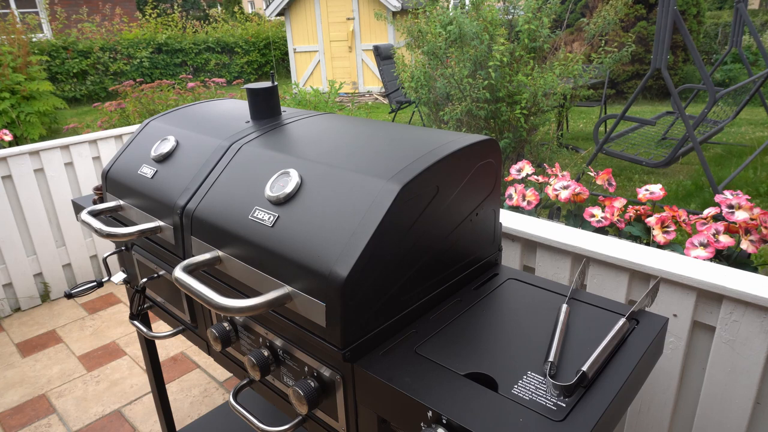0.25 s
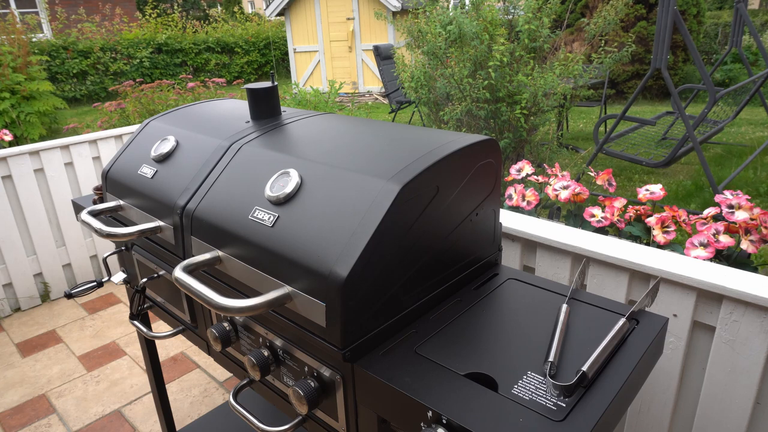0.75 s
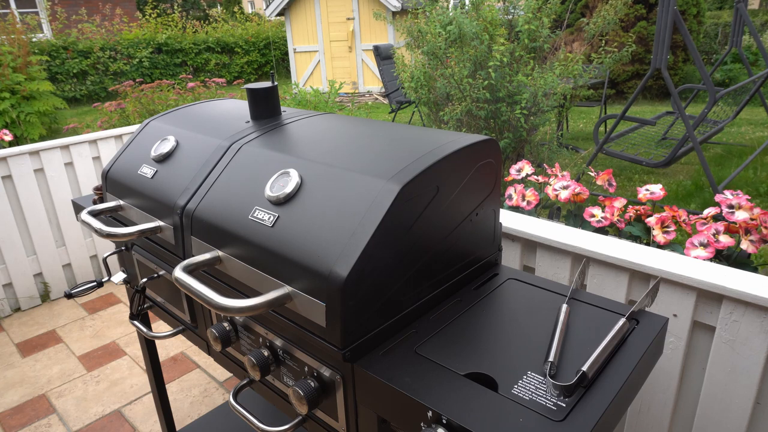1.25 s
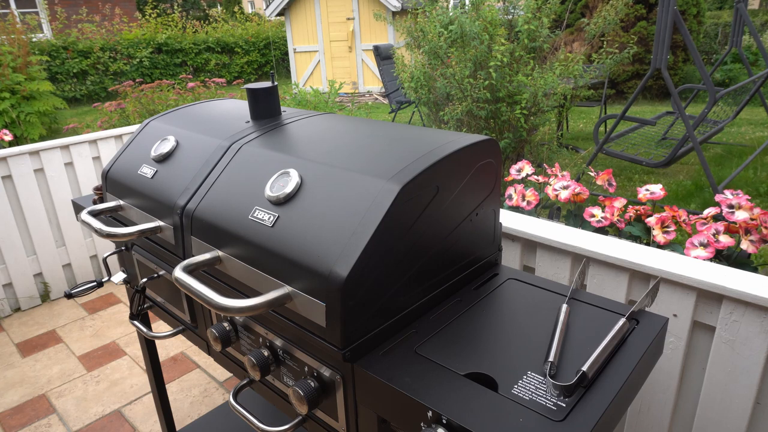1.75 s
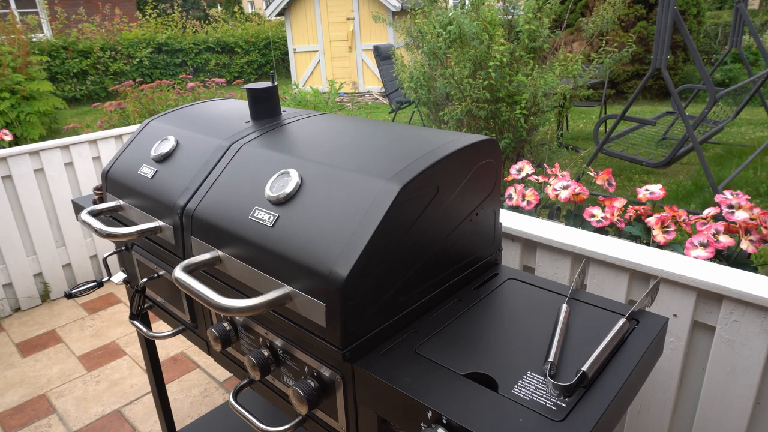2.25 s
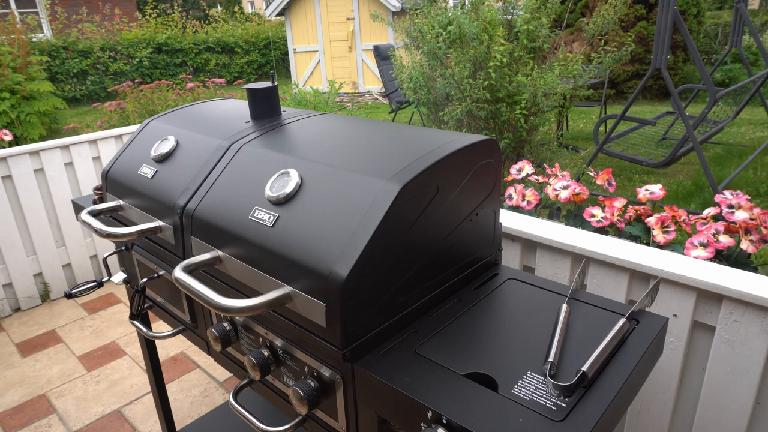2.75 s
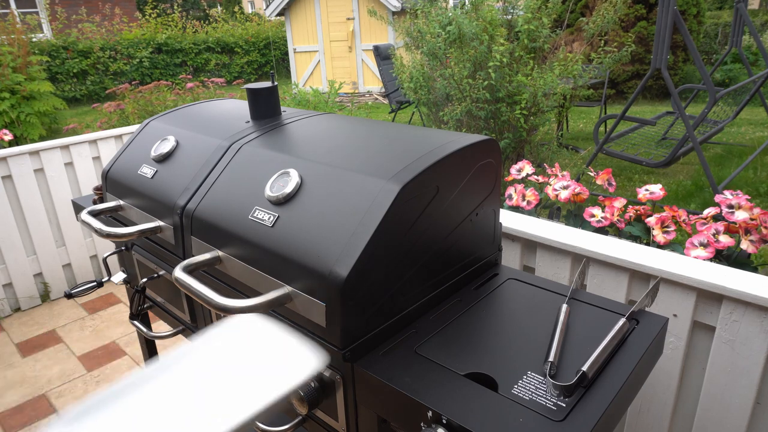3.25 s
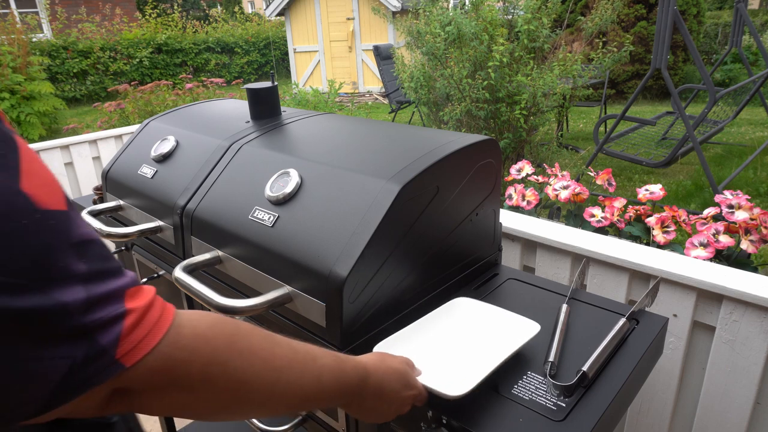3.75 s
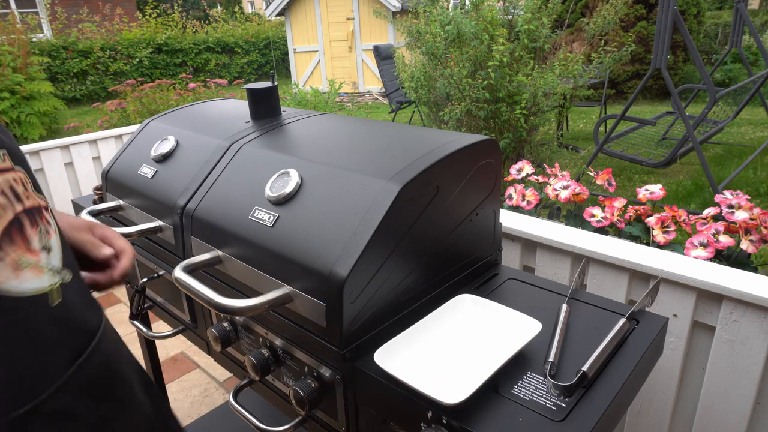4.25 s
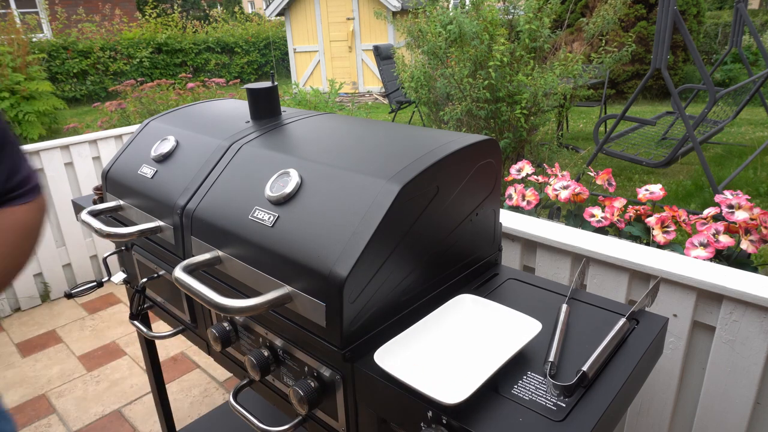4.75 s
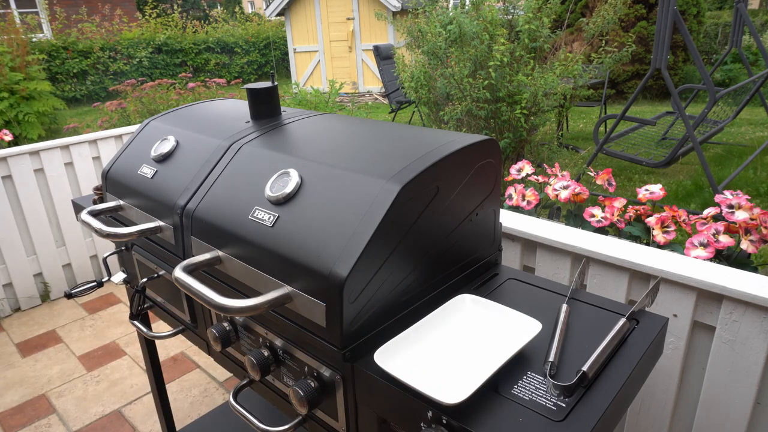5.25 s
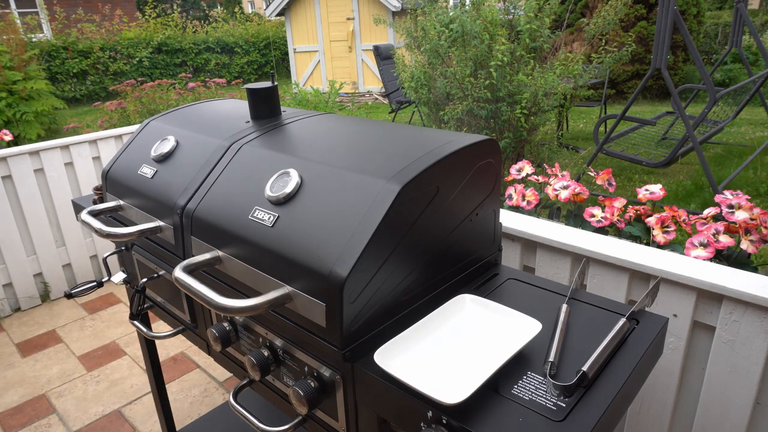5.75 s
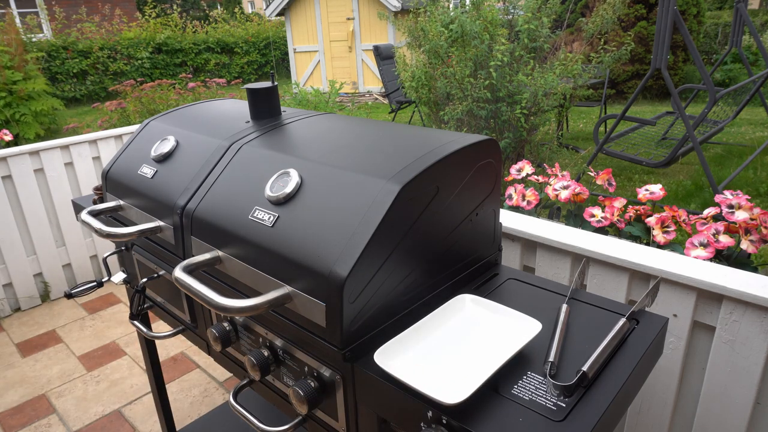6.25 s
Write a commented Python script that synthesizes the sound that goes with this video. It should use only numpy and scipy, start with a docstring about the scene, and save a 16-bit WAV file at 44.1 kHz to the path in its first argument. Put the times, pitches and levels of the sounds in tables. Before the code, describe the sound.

On an open patio, a covered gas grill gives a quiet, even frying hiss with occasional pops, low flames and a faint faraway motor drone. After some soft steps and a metallic tick, a plate is set down on a sheet-steel shelf close to the microphone, making a loud, brief, chattering clatter with a thin ring afterwards. A low thump and a couple of ticks follow while the sizzling continues.

```python
"""Food sizzles under the closed lid of a gas grill on a patio: bursting bubbles of fat hiss, spit and pop,
coloured by the hood's air resonances, while hot metal ticks and the burners murmur. Someone steps up
and sets a plate on the sheet-steel side shelf; it chatters down in two goes, exciting the shelf's modes,
overloading the microphone and leaving the tongs ringing. Air puffs by and a motor drones far off."""
import sys
import numpy as np
from scipy import signal
from scipy.fft import rfft, irfft, next_fast_len
from scipy.io import wavfile
from scipy.ndimage import map_coordinates

SR = 44100
rng = np.random.default_rng(int(sys.argv[2]) if len(sys.argv) > 2 else 0)


def wav_record(signal):
    """Record a signal, one row per channel, as 16-bit PCM in the file named by sys.argv[1]."""
    frames = np.transpose(np.atleast_2d(signal))
    bounded = np.clip(frames, -1, 1)
    # unit amplitude maps onto the largest positive 16-bit level
    quanta = np.round(bounded * 32767).astype(np.int16)
    wavfile.write(sys.argv[1], SR, quanta)


N = 286209

# broad spectrum of the sizzle: (frequency [Hz], relative level [dB])
SIZZLE_SPECTRUM = [(160, -22), (280, -0.5), (379, -3.5), (472, 0), (588, -4.5), (853, -3), (1460, -8),
                   (1620, -7.5), (2020, -8), (3350, -5.5), (4170, -8), (5370, -11), (8180, -11),
                   (13800, -15), (15800, -14.5)]
# air resonances of the hood: (frequency [Hz], bandwidth [Hz], gain [dB])
HOOD_MODES = [(489, 84, -11.5), (1607, 74, -5.5), (3200, 420, -16), (3330, 80, -20), (5600, 70, -17),
              (7170, 100, -7.5), (8580, 89, -4)]
# fat spitting on hot metal, and in the longer rows slow swells of the whole frying: (peak time [s], level [dB],
# length [s], width [octaves])
SPITS_AND_SWELLS = [(0.495, -40.5, 0.1, 2), (0.623, -39.5, 0.046, 0.61), (1.799, -43.5, 0.13, 1.5),
                    (2.297, -40, 0.063, 2.9), (2.681, -45.5, 0.36, 1.2), (2.779, -42, 0.022, 0.45),
                    (3.202, -40, 0.034, 1.2), (3.6, -43.5, 0.56, 1.8), (4.353, -46.5, 0.16, 1),
                    (4.79, -42.5, 0.11, 1.5), (5.022, -42, 0.035, 1.4), (5.4, -45.5, 0.74, 1.7),
                    (5.386, -38.5, 0.02, 0.5), (5.563, -39, 0.06, 0.38)]
# pops inside the hood: (time [s], level [dB], centre [Hz], width [octaves])
FAT_POPS = [(.421, -35.5, 1600, 1.7), (0.882, -34, 1490, 1.1), (1.636, -38, 5000, 1.4),
            (1.901, -26.5, 4700, 1.4), (2.2168, -36.5, 4000, 1.2), (2.585, -36, 900, 2.5),
            (3.3187, -35, 3700, 1.2)]
# plate edges hitting the shelf: (time [s], gain [dB], hardness [dB/octave], first flight [s])
PLATE_STRIKES = [(3.687, -1, 1, 0.016), (3.721, -0.5, 5.5, 0.024), (3.896, -1.5, -1.3, 0.015)]
# dense ring of the steel shelf: (frequency [Hz], relative level [dB])
SHELF_SPECTRUM = [(40, -55), (100, -8), (230, -8), (300, -8.5), (420, 1.5), (650, -1.5), (1100, 3),
                  (2100, -1), (3400, 1), (4200, -6.5), (5800, -11), (8000, -21.5), (12000, -25),
                  (15500, -36)]
# decay of that ring: (frequency [Hz], T60 [s])
SHELF_DECAY = [(100, 0.85), (400, 0.46), (1000, 0.29), (3000, 0.22), (6000, 0.19), (13000, 0.12)]
# strong modes of plate and shelf: (frequency [Hz], relative level [dB], T60 [s])
SHELF_MODES = [(380, -24, .5), (425, -26, .8), (497, -23, .6), (534, -16, .38), (673, -29, .8),
               (763, -18, .35), (797, -28, .75), (861, -11, .24), (1109, -22, .45), (1137, -16, .25),
               (1204, -18, .25), (1292, -18, .25), (1436, -18, .25), (1487, -17, .3), (1578, -17, .33),
               (1725, -18, .25), (1881, -18, .27), (2116, -22, .33), (2364, -19, .25), (2477, -12.5, .35),
               (2591, -17, .24), (2896, -18, .22), (3036, -33, .7), (3170, -17, .22), (3247, -17, .22),
               (3332, -16, .27), (3690, -19, .2)]
# slow after-ring of the grill cart: (frequency [Hz], T60 [s])
CART_DECAY = [(100, 3), (400, 1.44), (1000, 0.79), (3000, 0.58), (10000, 0.13)]
# ticks of hot metal: (time [s], level [dB], frequency [Hz])
METAL_TICKS = [(3.402, -18, 3200), (5.3613, -17.5, 4000), (5.8526, -14.5, 2300)]
# murmur of the flames: (frequency [Hz], relative level [dB])
BURNER_SPECTRUM = [(15, -41), (30, -32), (70, -2), (110, 1.5), (155, 1), (205, -3), (235, 2), (275, -15.5),
                   (400, -15), (900, -50)]
# soft steps and bumps: (time [s], level [dB], frequency [Hz], T60 [s])
STEP_THUDS = [(1.865, -32, 169, 0.12), (2.288, -27.5, 156, 0.11), (3.196, -26, 185, 0.083),
              (3.402, -31, 171, .07), (5.146, -15.5, 160, 0.029), (5.857, -34.5, 260, 0.16)]
# puffs of air at the microphone: (peak time [s], level [dB])
AIR_PUFFS = [(3.03, -47), (6.33, -40.5)]
# partials of the distant motor: (frequency [Hz], level [dB])
MOTOR_PARTIALS = [(49.7, -51), (99.8, -51.5)]


def sizzle(body_db=-44, spray_db=-45, lid_cutoff_hz=5500):
    """Transmission loss: the lid low-passes the hiss of frying, while fine spray escapes by its gaps."""
    wander_db = 0.14 * wobble(2.8)
    through_lid = lambda hz: 1 / np.sqrt(1 + (hz / lid_cutoff_hz) ** 6)
    through_gaps = lambda hz: np.sqrt(1 - through_lid(hz) ** 2)
    body = unit(filtered(bubbles(), lambda hz: hood_colour(hz) * through_lid(hz)))
    body *= amp(body_db + wander_db)
    spray = unit(filtered(bubbles(), lambda hz: hood_colour(hz) * through_gaps(hz)))
    spray *= amp(spray_db + 0.5 * wander_db + 0.5 * wobble(30))
    return under_lid(body + spray) * amp(0.45 * wobble(25))


def bubbles():
    """Superposition: countless tiny bubbles blur to Gaussian noise; larger ones crackle through it."""
    blur = rng.standard_normal(N)
    soft = amp(-2) * crackle(per_second=160, spread_db=2.0, life_s=0.0034)
    sharp = amp(-7.5) * crackle(per_second=300, spread_db=3.5, life_s=0.0015)
    return unit(blur + soft + sharp)


def crackle(per_second, spread_db, life_s):
    """Shot noise: bubbles of random size burst at random times, each a puff of decaying power."""
    when, size_draw = rng.random((int(per_second * N / SR), 2)).T
    sizes = amp(spread_db * np.minimum(-np.log(1 - size_draw), 4))
    bursts = np.bincount((when * N).astype(int), sizes ** 2, N)
    power = signal.lfilter([1], [1, -np.exp(-1 / (life_s * SR))], bursts)
    return unit(np.sqrt(power) * rng.standard_normal(N))


def hood_colour(hz):
    """Cavity resonance: the air under the hood lifts a few bands of the sizzle's spectrum."""
    resonances = sum(amp(db) * 1j * hz * width / (centre ** 2 - hz ** 2 + 1j * hz * width)
                     for centre, width, db in HOOD_MODES)
    return amp(along(SIZZLE_SPECTRUM, hz)) * (1 + resonances)


def under_lid(x, echo_db=-15, t60=0.06):
    """Comb filtering: weak reflections between lid and grate put a fine ripple on the spectrum."""
    t = np.arange(SR // 20) / SR
    echoes = rng.standard_normal(len(t)) * amp(-60 * t / t60) * (t > 0.002)
    echoes = filtered(echoes / np.linalg.norm(echoes), lambda hz: hz / (hz + 500))
    return x + amp(echo_db) * signal.fftconvolve(x, echoes)[:N]


def hiss(centre_hz, octaves, size):
    """Band-pass filtering: one band of the sizzle, as the hood colours it."""
    return noise(lambda hz: band(hz, centre_hz, octaves) * hood_colour(hz), size)


def spits(centre_hz=3240):
    """Flash boiling: drops of fat on hot metal hiss, swelling and fading with a flutter; the longer entries are
    slow swells of the whole frying."""
    out, t = np.zeros(N), np.arange(SR) / SR - 0.5
    for s, db, length, octaves in SPITS_AND_SWELLS:
        swell = np.exp(-2 * (t / length) ** 2)
        add(out, s - 0.5, amp(db) * swell * hiss(centre_hz, octaves, len(t)))
    return out * amp(1.2 * wobble(120))


def pops(rattle_t60=0.16, echo_db=-13.5, echo_t60=0.38):
    """Reverberation: each sudden burst rattles round the hood, which answers with a longer echo."""
    out, t = np.zeros(N), np.arange(SR // 3) / SR
    for s, db, centre_hz, octaves in FAT_POPS:
        rattle = amp(-60 * t / rattle_t60) * hiss(centre_hz, octaves, len(t))
        echo = amp(echo_db - 60 * t / echo_t60) * hiss(centre_hz=3000, octaves=0.7, size=len(t))
        add(out, s, amp(db) * (rattle + echo))
    return out


def plate(bounces=5, restitution=0.78, rebound_loss_db=3.5, bounce_loss_db=1):
    """Inelastic collision: after each strike the plate bounces ever sooner and more weakly."""
    out = np.zeros(N)
    for s, db, hardness, first_flight in PLATE_STRIKES:
        add(out, s, amp(db) * contact(hardness, crack_db=-3))
        flights = first_flight * restitution ** np.arange(bounces)
        for k, delay in enumerate(np.cumsum(flights)):
            gain = amp(db - rebound_loss_db - bounce_loss_db * k)
            add(out, s + delay, gain * contact(hardness=1.7, crack_db=-10))
    return out


def contact(hardness, crack_db, crack_t60=0.015):
    """Impulse excitation: a contact cracks and rings plate, shelf and cart; harder is brighter."""
    t = np.arange(SR) / SR
    colour = lambda hz: amp(along(SHELF_SPECTRUM, hz) + hardness * np.log2(1 + hz / 1500))
    shimmer = amp(-4) * damped(noise(colour, len(t)), SHELF_DECAY)
    cart = amp(-19.5) * damped(noise(colour, len(t)), CART_DECAY)
    crack = amp(crack_db - 60 * t / crack_t60) * noise(colour, len(t))
    ring = np.zeros(len(t))
    for hz, db, t60 in SHELF_MODES:
        envelope = amp(db + 2 * rng.standard_normal() - 60 * t / t60)
        ring += envelope * np.sin(2 * np.pi * (hz * t + rng.random()))
    return shimmer + cart + crack + amp(-3.5) * ring


def tongs(hz=984, db=-36.5, free_t60=4, settle_s=4.72, settled_t60=0.68):
    """Free vibration: the first strike sets the steel tongs ringing until settling adds damping."""
    out, t = np.zeros(N), np.arange(2 * SR) / SR
    struck_s = PLATE_STRIKES[0][0]
    since_settling = np.maximum(struck_s + t - settle_s, 0)
    fall_db = 60 * t / free_t60 + 60 * since_settling / settled_t60
    add(out, struck_s, amp(db - fall_db) * np.sin(2 * np.pi * hz * t))
    return out


def ticks(decay_cycles=0.47, echo_db=-20.5, echo_t60=0.26):
    """Stick-slip: hot metal gives way with one sharp swing, and the hood answers faintly."""
    out, t = np.zeros(N), np.arange(SR // 3) / SR
    for s, db, hz in METAL_TICKS:
        snap = np.sin(2 * np.pi * hz * t) * np.exp(-hz * t / decay_cycles)
        echo = amp(echo_db - 60 * t / echo_t60) * hiss(hz, octaves=1.8, size=len(t))
        add(out, s, amp(db) * (snap + echo))
    return out


def burners(flame_db=-44, whistle_db=-62, whistle_hz=10376):
    """Combustion and jet noise: the flames murmur low and the gas jet whistles in a narrow band."""
    flames = noise(lambda hz: amp(along(BURNER_SPECTRUM, hz)), N) * amp(flame_db + 1.5 * wobble(5.6))
    whistle = noise(lambda hz: 1 / (1 + ((hz - whistle_hz) / 30) ** 2), N)
    return flames + whistle * amp(whistle_db + 0.7 * wobble(15))


def footsteps(rise_s=0.0034):
    """Damped oscillation: each soft step or bump is a brief low tone with a little rumble round it."""
    out, t = np.zeros(N), np.arange(SR // 3) / SR
    for s, db, centre_hz, t60 in STEP_THUDS:
        tone = np.sin(2 * np.pi * centre_hz * t)
        rumble = noise(lambda hz: band(hz, centre_hz, octaves=0.51), len(t))
        envelope = amp(db - 60 * t / t60) * (1 - np.exp(-t / rise_s))
        add(out, s, envelope * (tone + 0.5 * rumble))
    return out


def draught(rise_s=0.04, fall_s=0.22, still_air_db=-68):
    """Turbulence: each puff of air at the microphone is a low rumble that rises quickly and ebbs."""
    t = np.arange(N) / SR
    flow = sum(amp(db) * np.exp(-np.maximum((s - t) / rise_s, (t - s) / fall_s)) for s, db in AIR_PUFFS)
    return (amp(still_air_db) + flow) * noise(lambda hz: band(hz, centre_hz=30, octaves=0.79), N)


def motor(speed_spread=0.01204):
    """Periodic vibration: a far motor drones on two partials that waver together with its speed."""
    warped_time = np.cumsum(1 + speed_spread * wobble(4)) / SR
    return sum(np.sqrt(2) * amp(db + 0.87 * wobble(6.6)) * np.sin(2 * np.pi * hz * warped_time)
               for hz, db in MOTOR_PARTIALS)


def amp(db):
    """Decibels to amplitude ratio."""
    return 10 ** (np.asarray(db) / 20)


def unit(x):
    """Normalisation to rms 1."""
    return x / np.sqrt(np.mean(x ** 2) + 1e-20)


def along(points, hz):
    """Interpolation of (frequency [Hz], value) points on a log-frequency axis."""
    frequencies, values = np.transpose(points)
    return np.interp(np.log(hz + 1), np.log(frequencies + 1), values)


def band(hz, centre_hz, octaves):
    """Gaussian passband on a log-frequency axis."""
    return np.exp(-0.5 * (np.log2((hz + 1) / centre_hz) / octaves) ** 2)


def wobble(rate):
    """Random modulation: a smooth curve with `rate` knots a second."""
    knots = rng.standard_normal(int(N * rate / SR) + 4)
    return map_coordinates(knots, [np.arange(N) * rate / SR])


def filtered(x, response):
    """Linear filtering: the spectrum of x times a frequency response."""
    size = next_fast_len(len(x) + SR // 10)
    return irfft(rfft(x, size) * response(np.fft.rfftfreq(size, 1 / SR)), size)[:len(x)]


def noise(response, size):
    """Spectral shaping: coloured noise of rms 1."""
    return unit(filtered(rng.standard_normal(size), response))


def damped(x, t60s):
    """Frequency-dependent damping: each band of x decays at its own rate."""
    hz, t, spectra = signal.stft(x, SR, nperseg=256)
    decay = amp(-60 * t / along(t60s, hz)[:, None])
    return signal.istft(spectra * decay, SR, nperseg=256)[1][:len(x)]


def add(track, s, sound):
    """Superposition of a sound on the track at s seconds."""
    start = max(round(s * SR), 0)
    track[start:start + len(sound)] += sound[:len(track) - start]


def scene():
    """Free field: in open air the sources simply add, here into one channel."""
    grill = sizzle() + spits() + pops() + ticks() + burners()
    shelf = plate() + tongs()
    background = footsteps() + draught() + motor()
    return (grill + shelf + background)[None]


def record(dry, knee=10, cutoff_hz=15780):
    """Saturation: the loud plate strikes clip at full scale; the sound is then low-passed at 15.8 kHz."""
    clipped = dry[0] / (1 + np.abs(dry[0]) ** knee) ** (1 / knee)
    return filtered(clipped, lambda hz: hz < cutoff_hz)[None]


dry = scene()
out = record(dry)
wav_record(out)
```